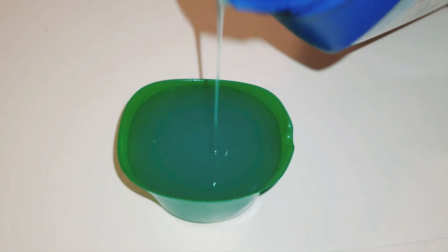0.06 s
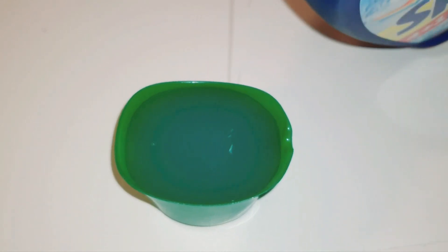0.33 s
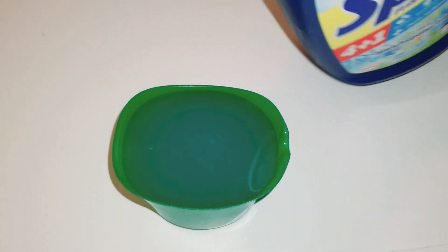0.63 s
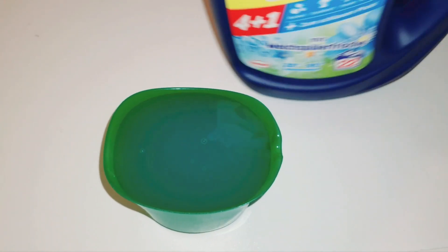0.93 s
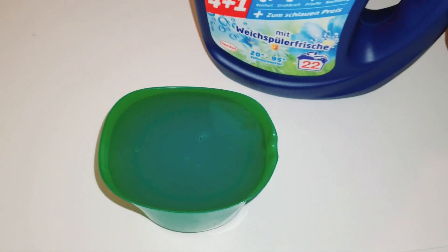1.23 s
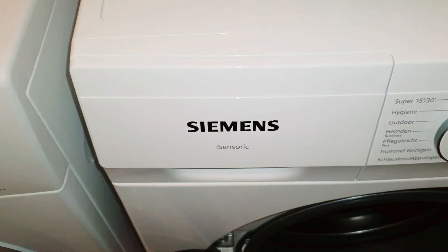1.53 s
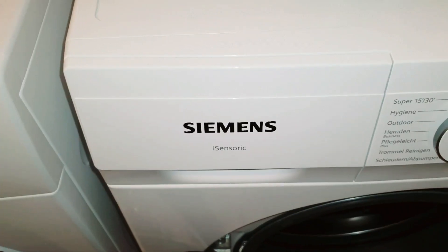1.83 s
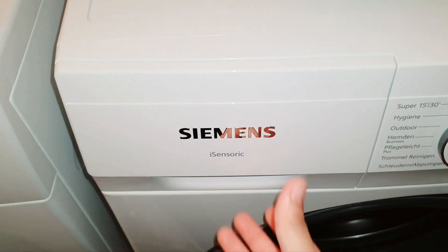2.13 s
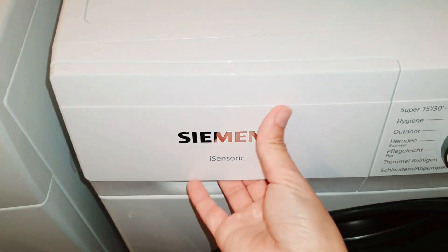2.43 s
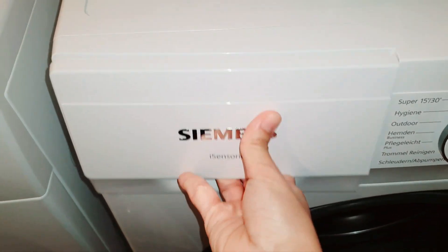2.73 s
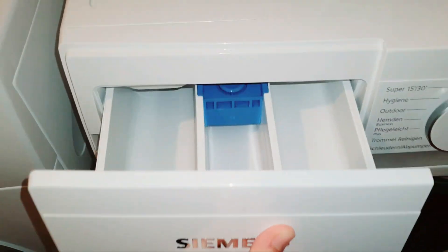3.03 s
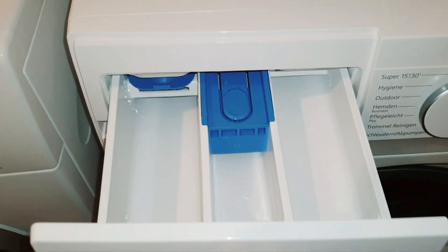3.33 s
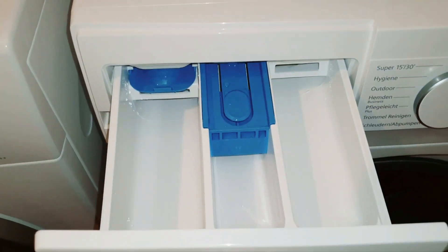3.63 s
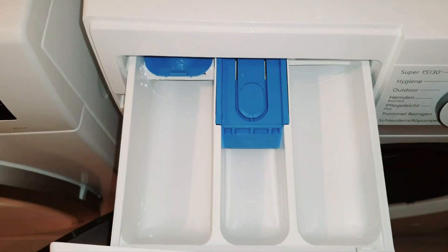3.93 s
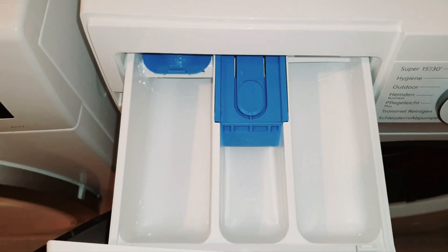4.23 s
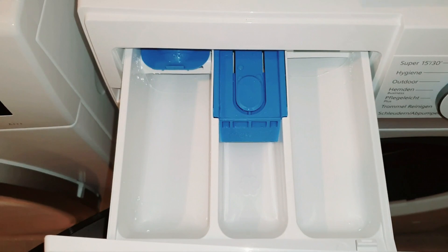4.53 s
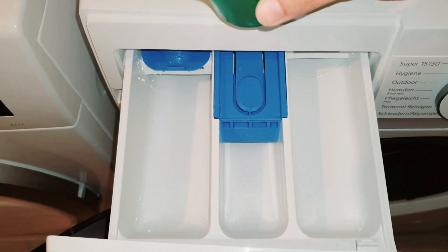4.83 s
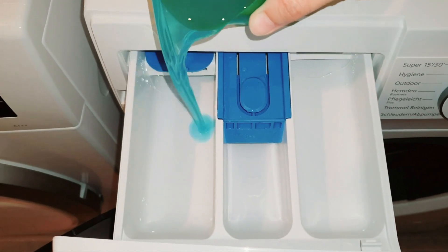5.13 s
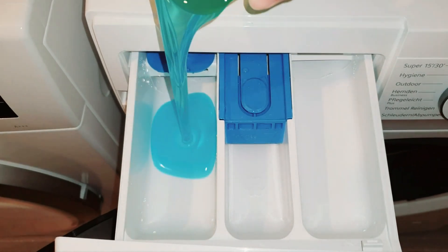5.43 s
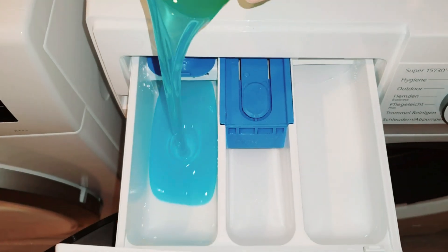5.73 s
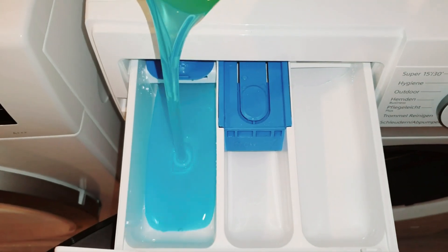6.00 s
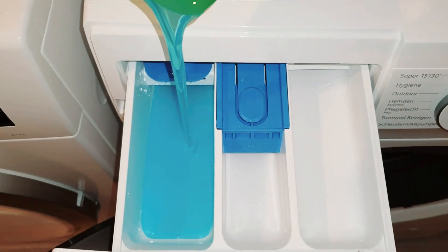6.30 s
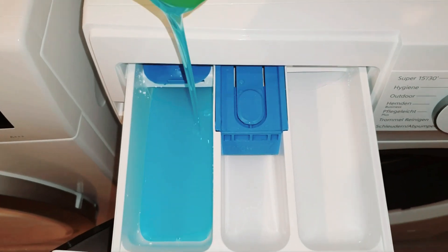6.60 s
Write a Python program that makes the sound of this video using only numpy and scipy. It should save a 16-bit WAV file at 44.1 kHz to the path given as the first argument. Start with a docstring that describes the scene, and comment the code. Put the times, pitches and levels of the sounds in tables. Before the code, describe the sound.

In a small room with hard walls and a faint low hum, a part-filled plastic bottle is set down nearby with a hollow thud and a quick bounce. After a pause, a washing machine's plastic drawer creaks, snaps out of its catch with a loud rattle and slides open, scraping and knocking. It ends on a sharp knock, and then only a few soft plastic taps are heard.

```python
"""A plastic detergent bottle thuds onto a washing machine and rocks to rest, squeaking faintly.
Fingers grip the dispenser drawer and tug it out of its catch with sharp clicks. It scrapes and
knocks along its runners to its stop, each knock ringing the hollow plastic. Light taps follow as
the dosing cap is emptied into it. The small room echoes and is filled with a faint low hum."""
import sys
import numpy as np
from scipy import signal
from scipy.fft import rfft, irfft, next_fast_len
from scipy.io import wavfile

SR = 44100
rng = np.random.default_rng(int(sys.argv[2]) if len(sys.argv) > 2 else 0)


def wav_out(sig):
    """Save sig, one row per channel (or a flat mono array), as 16-bit PCM at SR to the path in sys.argv[1]."""
    wavfile.write(sys.argv[1], SR, np.round(np.clip(np.atleast_2d(sig).T, -1, 1) * 32767).astype(np.int16))


N = 298116
RING = SR // 4  # samples that a struck part rings


def undb(db):
    """Turn decibels (dB) into a number to multiply by."""
    return 10 ** (np.asarray(db) / 20)


def unit(x):
    """Scale a sound to an average (rms) level of 1."""
    return x / np.sqrt(np.mean(x ** 2))


def along(points, hz):
    """Read between (Hz, value) points, spacing octaves evenly."""
    f, value = np.transpose(points)
    return np.interp(np.log(hz + 1e-9), np.log(f), value)


def band(x, lo, hi, order=3):
    """Keep the pitches between lo and hi Hz."""
    sos = signal.butter(order, [lo, min(hi, .48 * SR)], "band", fs=SR, output="sos")
    return signal.sosfilt(sos, x + 1e-18)


def tint(x, points):
    """Turn pitches up or down along a curve of (Hz, dB) points."""
    n = x.shape[-1]
    size = next_fast_len(n + 2048)
    gain = undb(along(points, np.fft.rfftfreq(size, 1 / SR)))
    return irfft(rfft(x, size) * gain, size)[..., :n]


def noise(n, apart_hz=1000):
    """Stereo hiss: left and right are alike in the bass, unrelated in the treble."""
    size = next_fast_len(n, True)
    mid, side = rfft(rng.standard_normal((2, size)))
    turn = np.pi / 4 * np.clip(np.fft.rfftfreq(size, 1 / SR) / apart_hz, .25, 1)
    return irfft(np.array([mid * np.cos(turn) + s * side * np.sin(turn) for s in (1, -1)]), size)[:, :n]


def fade(t60, n=RING):
    """Die away by 60 dB every t60 seconds (the ring time)."""
    return np.exp(-np.log(1000) * np.arange(n) / SR / t60)


def add(out, s, x):
    """Mix x into out, starting at s seconds."""
    i = int(s * SR)
    out[:, i:i + x.shape[1]] += x[:, :N - i]


# The tone of the hiss. Each row: pitch in Hz, relative level in dB.
HISS_TONE = [(13, -56.5), (22, -27), (32, -15.5), (44, -10.5), (64, -3.5), (78, -8.5), (87, -21),
             (127, -17.5), (187, -32.5), (450, -34), (801, -38), (997, -35), (7390, -42.5), (8950, -50.5),
             (15500, -40)]

def hum(hum_hz=61, width_hz=9, hum_db=-67, hiss_db=-78.5):
    """A low, wavering room hum over faint hiss."""
    drone = band(noise(N + RING), hum_hz - width_hz / 2, hum_hz + width_hz / 2, order=2)[:, RING:]
    hiss = tint(noise(N), HISS_TONE)
    hiss /= np.std(band(hiss, 300, 15000))  # hiss_db counts only the part above the bass
    return undb(hum_db) * unit(drone) + undb(hiss_db) * hiss


def ring(notes, scatter_db, apart_hz=1500):
    """A struck part rings with its own notes, in a new balance for each spot that is hit."""
    t, out = np.arange(RING) / SR, np.zeros((2, RING))
    for k, (hz, db, t60) in enumerate(notes):
        size, lag = rng.standard_normal(2)
        n = min(int(t60 * SR), RING)
        # high notes reach left and right out of step
        skew = min(hz / apart_hz, 1) * lag * np.array([[.5], [-.5]]) * np.pi / 2
        wave = (-1) ** k * np.sin(2 * np.pi * hz * t[:n] + skew)
        out[:, :n] += undb(db + scatter_db * size) * fade(t60, n) * wave
    return out


# The borders in Hz of a knock's four ranges: cabinet boom, hollow thud, wall clack, contact tick.
RANGE_EDGES = [45, 160, 450, 3000, 16000]

def knocks(blows, notes, wall_tone, wall_db, wall_t60, crack_db, crack_t60,
           hollow_db, hollow_t60, panel_db, contact_s, scatter_db, trims_db):
    """Each blow cracks, then rings the walls and a hollow note set by how the part is held."""
    out = np.zeros((2, N))
    onset = 1 - np.exp(-np.arange(RING) / SR / contact_s)
    dying = undb(wall_db) * fade(wall_t60) + undb(crack_db) * fade(crack_t60)
    ranges = [signal.butter(3, edges, "band", fs=SR, output="sos")
              for edges in zip(RANGE_EDGES, RANGE_EDGES[1:])]
    for s, hollow_hz, panel_hz, *levels in blows:
        body = ring([(hollow_hz, hollow_db, hollow_t60)] + list(notes), scatter_db)
        body += dying * unit(tint(noise(RING), wall_tone))
        panel = band(body, panel_hz / 1.2, panel_hz * 1.2, order=1)  # the struck panel lifts its range
        body = onset * (body + undb(panel_db) * panel)
        # where and how hard the blow lands sets each range's level
        for sos, db, trim in zip(ranges, levels, trims_db):
            part = onset * signal.sosfiltfilt(sos, body + 1e-18, padtype=None)
            early_level = np.sqrt(np.mean(part[:, :SR // 50] ** 2))
            add(out, s, part * undb(db + trim) / early_level)
    return out


# The bottle's blows. Each row: start in seconds, hollow pitch and panel pitch in Hz,
# then boom, thud, clack and tick levels in dB.
BOTTLE_BLOWS = [(.478, 420, 940, -67.5, -65, -74, -76.5), (1.1, 286, 1052, -28, -16.5, -26, -41.5),
                (1.123, 261.8, 630, -32.5, -22.5, -40.5, -52.5), (1.165, 368, 640, -40, -36.5, -49, -55.5),
                (1.352, 364, 1020, -60, -46, -62.5, -69)]
# The part-filled bottle on the lid. Each row: pitch in Hz, relative level in dB, ring time in seconds.
BOTTLE_NOTES = [(62.82, -10, .25), (87.4, -12, 0.078), (120.2, -20, .22), (256.7, 2, 0.098),
                (337, 0.5, 0.059), (376.8, -3, .12), (455, -13, 0.046), (703, -11, 0.058),
                (750, -15, 0.076), (950, -13, .06), (1144, -16.5, 0.074), (1275, -16, 0.084),
                (1777, -15, 0.089), (2222, -27, 0.048), (3000, -34, 0.083), (4380, -36, .025)]
# The blur of short notes from its walls. Each row: pitch in Hz, relative level in dB.
BOTTLE_WALL_TONE = [(260, -33), (450, -1.5), (876, -18), (1020, -16.5), (1430, -16.5), (2100, -17),
                    (2430, -26), (4270, -39), (15500, -68.5)]

def bottle():
    """The heavy bottle thuds on the machine's lid, bounces and rocks."""
    return knocks(BOTTLE_BLOWS, BOTTLE_NOTES, BOTTLE_WALL_TONE, wall_db=0.5, wall_t60=0.036,
                  crack_db=6.5, crack_t60=0.0059, hollow_db=1.0, hollow_t60=0.023, panel_db=-2.5,
                  contact_s=0.001, scatter_db=2.57, trims_db=(-0.039, -0.073, -.5, -.5))


# Slips on the bottle, then the drawer. Each row: start in seconds, pitch in Hz, pitch spread in Hz,
# length in seconds, level in dB.
SQUEAKY_SLIPS = [(0.474, 4700, 497, 0.011, -71.5), (0.476, 970, 100, 0.012, -64.5),
                 (1.24, 1007, 45, .055, -55), (1.258, 1810, 80, .025, -58), (1.328, 2120, 1500, 0.13, -65),
                 (1.344, 1019, 50, 0.033, -49), (1.359, 1010, 70, .05, -56.5),
                 (2.445, 1000, 450.4, .022, -46.5), (2.475, 4070, 160, .03, -47),
                 (2.477, 5350, 400, .025, -53.5), (2.478, 7500, 8000, 0.043, -54),
                 (2.495, 1560, 293, .035, -43), (2.514, 800, 149.9, 0.024, -47.5)]

def squeaks():
    """Plastic and fingertips chatter over smooth plastic in short squeaks and creaks."""
    out = np.zeros((2, N))
    for s, hz, width_hz, length, db in SQUEAKY_SLIPS:
        n = min(int(length * SR), RING)
        chatter = band(noise(RING), max(hz - width_hz / 2, hz / 10), hz + width_hz / 2, order=2)[:, -n:]
        add(out, s, unit(chatter) * np.hanning(n) * undb(db))
    return out


# Blows on the drawer and its housing. Each row: start in seconds, hollow pitch and panel pitch in Hz,
# then thud, clack and tick levels in dB.
DRAWER_BLOWS = [ (1.978, 297, 1890, -89, -79, -87), (2.446, 352, 831, -65, -48, -61),
                (2.551, 309, 637, -36, -39, -49.5), (2.649, 322, 1250, -31.5, -34.5, -44.5),
                (2.921, 397, 908, -40.5, -30.5, -44), (2.931, 277, 1000, -22, -18, -31),
                (2.944, 279, 815, -18, -24, -36.5), (2.954, 398, 1149, -27, -24.5, -38),
                (2.964, 207.3, 1150, -22.5, -30, -50), (2.981, 279, 2223, -22, -26, -35),
                (2.993, 231.9, 850, -26, -28, -44), (3.134, 293, 814, -39, -37.5, -55),
                (3.295, 231, 704, -21.5, -28, -50), (3.311, 237, 828, -26, -31.5, -50),
                (3.375, 240, 619.8, -36.5, -36, -54.5), (3.391, 223.5, 1568, -27.5, -38, -45.5),
                (3.57, 207, 900, -41, -51, -59), (3.613, 224, 1400, -25, -18.5, -33.5),
                (3.935, 406, 917, -70, -58.5, -74), (3.976, 388, 1086, -64, -54.5, -73),
                (4.016, 392, 870, -89, -47.5, -65.5), (4.303, 259.7, 1883, -77, -74, -80),
                (4.990, 170, 500, -75.5, -88, -92), (5.309, 245, 1220, -50, -56.5, -71),
                (5.718, 407, 500, -65.5, -84, -81)]
# When it presses on its catch or stop. Each row: start and end in seconds.
PRESSED_TIMES = [(2.6, 3.0), (3.6, 4.0)]
# The drawer's own notes. Each row: pitch in Hz, relative level in dB, ring time in seconds.
DRAWER_NOTES = [(73.52, -21, 0.053), (99.4, -30.5, 0.15), (198, -5.5, .09), (266, -4.5, 0.037),
                (335.6, -10, 0.022), (450, -10.5, 0.087), (545, -14.5, .07), (677, -7.5, 0.14),
                (804, -2.5, 0.081), (899, -8, .07), (1040, -6, .09), (1151.7, -4.5, 0.06),
                (1350, -15, 0.017), (1451.6, -5.5, .04), (1674, -8, 0.032), (2030, -13.5, 0.035),
                (2090, -6.5, 0.017), (2290, -14, .04), (2776, -11, .035), (3190, -16, .03),
                (4040, -21, .03), (4330, -28, .03), (6180, -34.5, .04)]
# The blur of short notes from its walls. Each row: pitch in Hz, relative level in dB.
DRAWER_WALL_TONE = [(240, -31.5), (400, -8.5), (633, 1.5), (784, -1.5), (1150, -1.5), (1690, -8.5),
                    (2060, -6.5), (2900, -14), (4200, -22.5), (5400, -28), (7600, -25.5), (9350, -42),
                    (15500, -44.5)]

def drawer(pressed_boom_db=-7.5, loose_boom_db=-18.5):
    """The light, hollow drawer knocks; pressed on its catch or stop, it shakes the cabinet more."""
    blows = []
    for s, hollow_hz, panel_hz, thud, clack, tick in DRAWER_BLOWS:
        pressed = any(start < s < end for start, end in PRESSED_TIMES)
        boom = (thud + clack) / 2 + (pressed_boom_db if pressed else loose_boom_db)
        blows.append((s, hollow_hz, panel_hz, boom, thud, clack, tick))
    return knocks(blows, DRAWER_NOTES, DRAWER_WALL_TONE, wall_db=6.0, wall_t60=0.054,
                  crack_db=13.5, crack_t60=0.0057, hollow_db=5.0, hollow_t60=0.07, panel_db=1.5,
                  contact_s=0.0016, scatter_db=3.0, trims_db=(0.7, 0, -.5, -0.92))


# The hand grips, takes up slack, clears the catch, slides, meets the stop and lets go.
# Each row: time of full force and hold time in seconds, build-up in dB per second, level in dB.
PUSHES = [(2.489, 0.08, 450.5, -50), (2.645, .003, 420.5, -45.5), (2.926, 0.053, 1400.5, -31),
          (3.047, .345, 399, -47), (3.604, .004, 85, -45.5), (3.978, 0.0042, 221, -55)]

def rubbing_level(release_db_per_s=599.5):
    """Each push builds up, holds and lets go; the strongest one sets how loud the rubbing is."""
    t = np.arange(N) / SR
    pushes = [db - build * np.maximum(s - t, 0) - release_db_per_s * np.maximum(t - s - hold, 0)
              for s, hold, build, db in PUSHES]
    return undb(np.max(pushes, axis=0))


# The tone of the scraping. Each row: pitch in Hz, relative level in dB.
SCRAPE_TONE = [(100, -36.5), (170, -5), (239, -13.5), (508, -23.5), (728, -6), (800, -16.5), (1080, -16),
               (1230, -18), (1440, -16.5), (2780, -19), (4200, -24.5), (5400, -28.5), (7800, -27.5),
               (9200, -40), (15500, -43.5)]

def runners(slips_per_s=900, spread_db=0.5, slip_t60=0.029, body_db=-1.5, held_ring=0.11):
    """The drawer sticks and slips, scraping and ringing; hand and rails cut the ring short."""
    chance, size = rng.random(N), rng.exponential(size=N)
    slips = (chance < slips_per_s / SR) * undb(spread_db * np.minimum(size, 4))
    grit = np.sqrt(np.abs(signal.fftconvolve(slips ** 2, fade(slip_t60 / 2))[:N]))
    scrape = unit(tint(noise(N) * grit, SCRAPE_TONE))
    held_notes = [(hz, db, t60 * held_ring) for hz, db, t60 in DRAWER_NOTES]
    kicks = slips * rng.choice([-1, 1], N)
    body = signal.fftconvolve(kicks[None], ring(held_notes, scatter_db=0.85))[:, :N]
    return (scrape + undb(body_db) * unit(band(body, 180, 2500))) * rubbing_level()


# Edges snapping past each other. Each row: start in seconds, level in dB.
EDGE_SNAPS = [(2.484, -51), (2.929, -30), (2.982, -30.5), (3.391, -46.5), (3.611, -33.5), (3.936, -58.5),
              (4.015, -51)]

def snaps(low_hz=5500, high_hz=12000, snap_t60=.016):
    """A hard edge slips free with a brief, bright click."""
    out = np.zeros((2, N))
    for s, db in EDGE_SNAPS:
        add(out, s, undb(db) * fade(snap_t60) * unit(band(noise(RING), low_hz, high_hz, order=2)))
    return out


# How long the echo lasts. Each row: pitch in Hz, ring time in seconds.
ECHO_TIMES = [(60, 0.98), (160, 0.82), (300, 0.5476), (1000, 0.4855), (4000, 0.4538), (8000, 0.38),
              (15000, 0.37)]
# The echo's tone. Each row: pitch in Hz, relative level in dB.
ECHO_TONE = [(40, -6), (120, 9.5), (210, -6.5), (320, -4.5), (600, -3.5), (2000, -4.5), (6000, -4.5),
             (15000, -4.5)]
# Notes trapped between the walls. Each row: pitch in Hz, relative level in dB, ring time in seconds.
ROOM_NOTES = [(66.87, -0.5, .8), (87, -3.5, .55), (127, 0.5, 0.48), (271, -12, 0.45), (376, -8.5, 0.38)]

def room(x, echo_db=-4.5, build_s=0.0027, notes_db=-1):
    """Close, hard walls echo almost at once; the bass lingers longest."""
    n = SR * 3 // 4
    edges, t = np.geomspace(35, 17000, 10), np.arange(n) / SR
    hiss = noise(n)
    echo = sum(band(hiss, lo, hi) * fade(along(ECHO_TIMES, np.sqrt(lo * hi)), n)
               for lo, hi in zip(edges, edges[1:]))
    echo *= 1 - np.exp(-(t / build_s) ** 2)
    echo = undb(echo_db) * tint(echo / np.sqrt(np.sum(echo ** 2) / 2), ECHO_TONE)
    for hz, db, t60 in ROOM_NOTES:
        decay = fade(t60, n)
        echo += undb(db + notes_db) * np.cos(2 * np.pi * hz * t) * 2 * decay / decay.sum()
    return x + signal.fftconvolve(x, echo, axes=1)[:, :N]


# The lean to the left. Each row: pitch in Hz, dB added on the left and taken from the right.
LEFT_LEAN = [(300, 0), (550, .6), (1100, -.5), (2200, 2.2), (4200, 4.4), (7500, 1.8)]

def scene():
    """The plastic sounds echo in the room, brighter on the left, over the hum."""
    left, right = room(bottle() + drawer() + snaps() + runners() + squeaks())
    opposite = [(hz, -db) for hz, db in LEFT_LEAN]
    return np.array([tint(left, LEFT_LEAN), tint(right, opposite)]) + hum()


def record(dry, top_hz=15850):
    """The recorder cuts off the highest treble."""
    return signal.sosfilt(signal.ellip(10, .2, 80, top_hz, fs=SR, output="sos"), dry)


dry = scene()
out = record(dry)
wav_out(out)
```